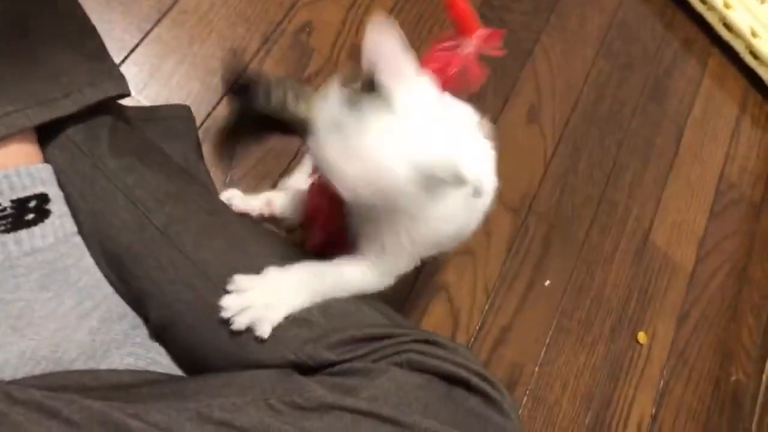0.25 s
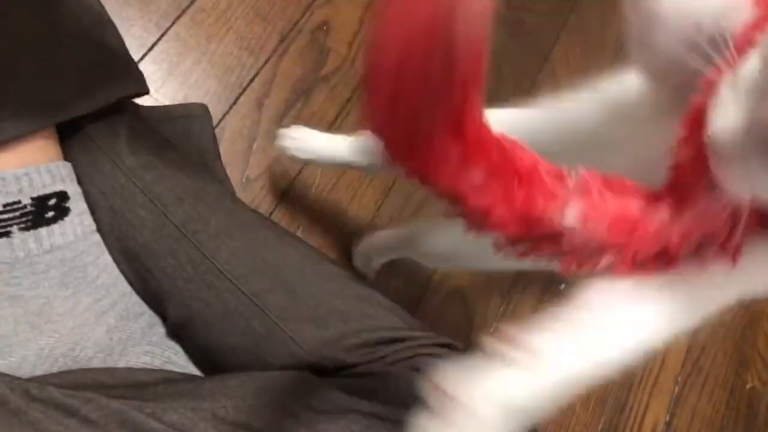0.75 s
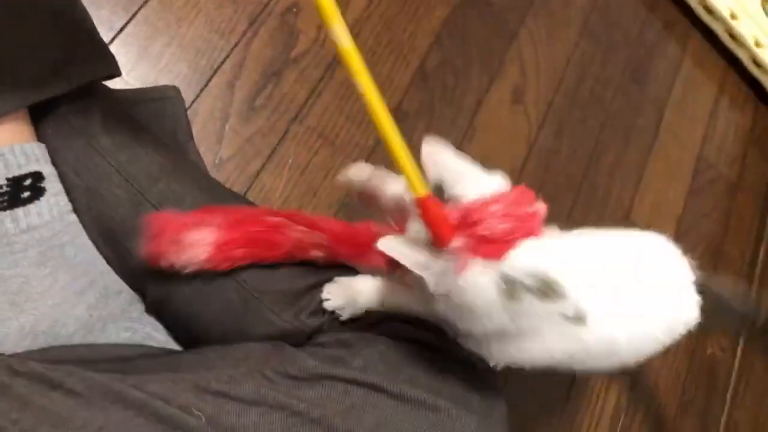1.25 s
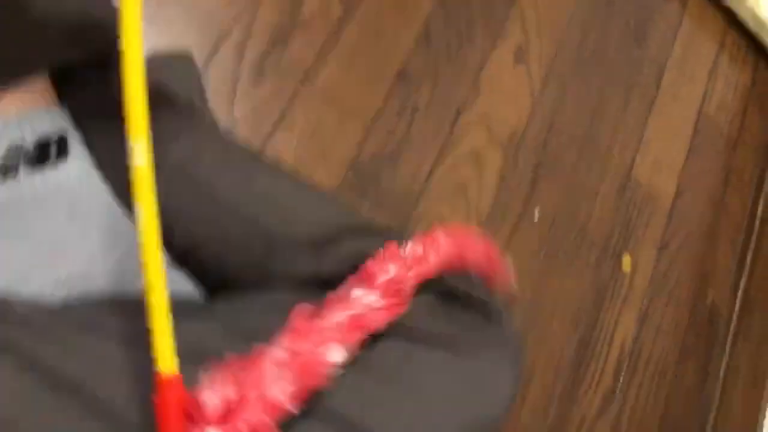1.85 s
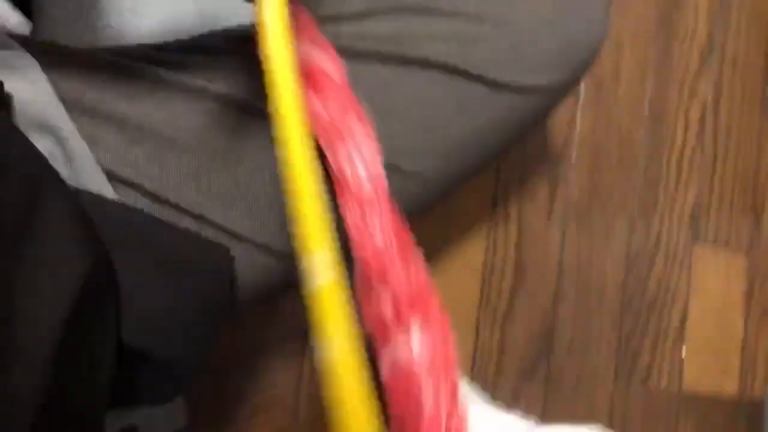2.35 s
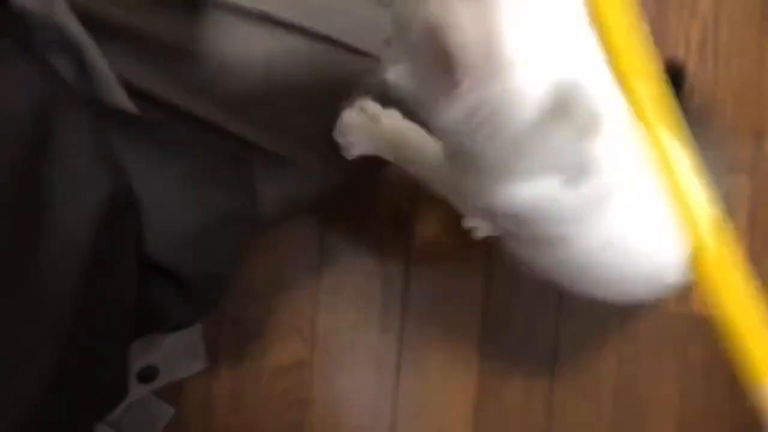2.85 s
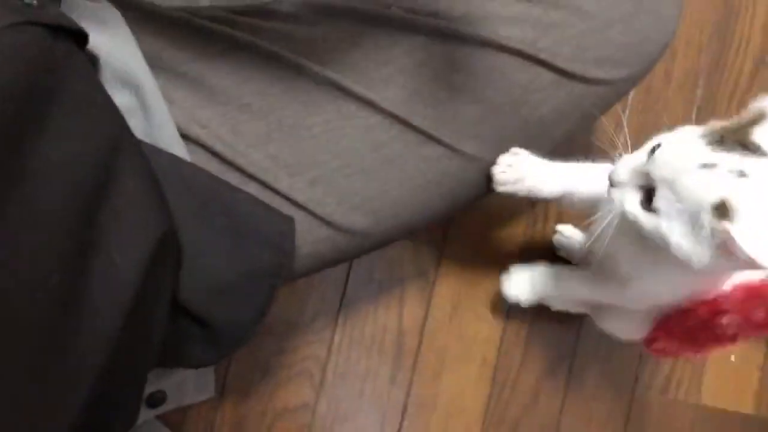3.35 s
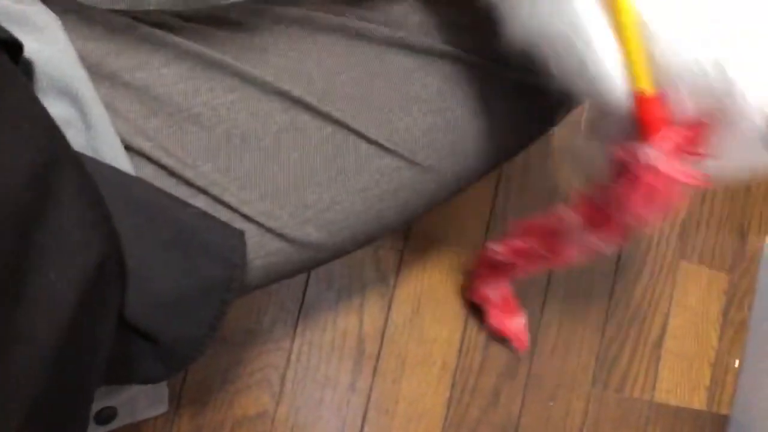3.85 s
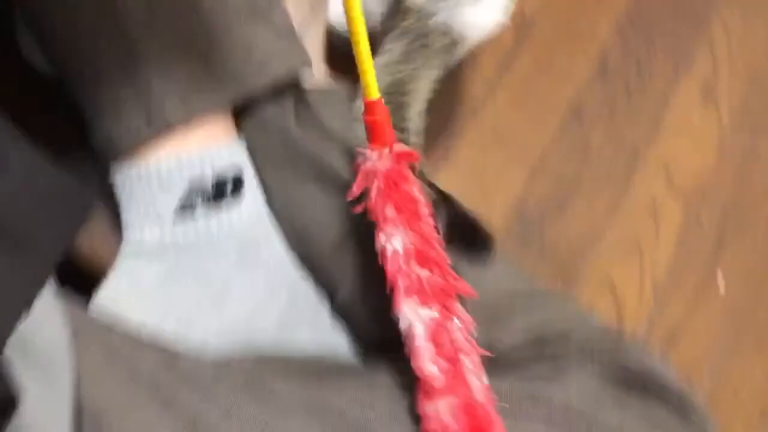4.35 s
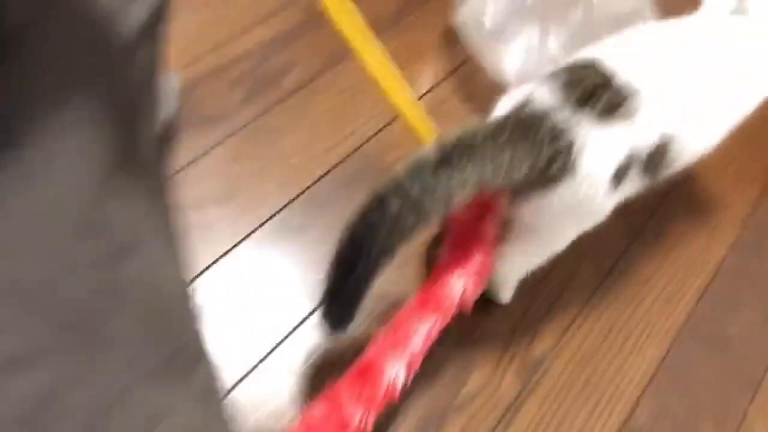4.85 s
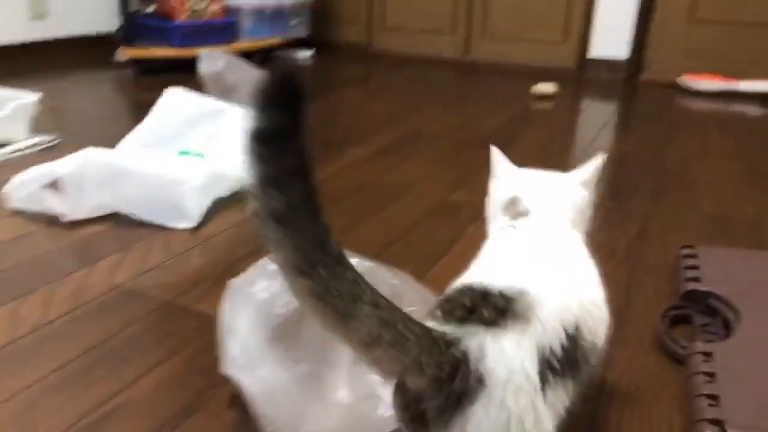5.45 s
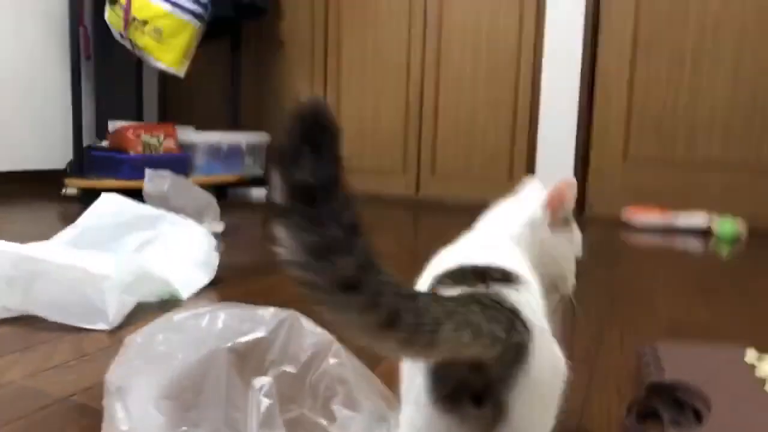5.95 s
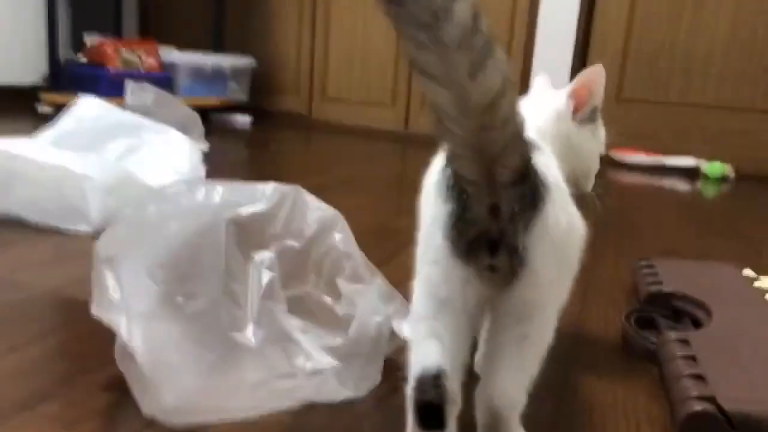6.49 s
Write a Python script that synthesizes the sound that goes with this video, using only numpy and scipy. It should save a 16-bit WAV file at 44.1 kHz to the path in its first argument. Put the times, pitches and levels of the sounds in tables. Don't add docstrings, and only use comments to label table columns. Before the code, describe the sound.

A kitten pounces with soft low thumps on wooden boards, brushing cloth and ticking its claws, before something hard bounces loudly at the end.

```python
import sys
import numpy as np
from scipy import signal
from scipy.fft import rfft, irfft
from scipy.io import wavfile
from scipy.ndimage import uniform_filter1d

SR = 44100
rng = np.random.default_rng(int(sys.argv[2]) if len(sys.argv) > 2 else 0)


def natural_amplitude(level_db):
    exponent = np.asarray(level_db, float) / 20
    return 10 ** exponent


def int16_out(signal):
    q = np.round(np.clip(np.atleast_2d(signal).T, -1, 1) * 32767)
    wavfile.write(sys.argv[1], SR, q.astype(np.int16))


N = 296352
SIZE = 2 ** 15
HZ = np.fft.rfftfreq(SIZE, 1 / SR)


def unit(x):
    return x / np.sqrt(np.mean(x ** 2) + 1e-20)


def along(points, hz):
    point_hz, values = np.transpose(points)
    return np.interp(np.log(hz + 1), np.log(point_hz + 1), values)


def peak(hz, width_hz):
    return 1j * HZ * width_hz / (hz * hz - HZ * HZ + 1j * HZ * width_hz + 1e-9)


def add(out, start_s, x):
    out[round(start_s * SR):][:len(x)] += x


def tail(onset_s):
    # (frequency [Hz], time to fall by 60 dB [s])
    ring_times = [(80, 0.3), (250, 0.34), (700, 0.32), (2000, 0.28), (6000, 0.21), (14000, 0.12)]
    hz, t, z = signal.stft(rng.standard_normal(SIZE * 3 // 4), SR, nperseg=512)
    decay = natural_amplitude(-60 * t / along(ring_times, hz)[:, None])
    x = signal.istft(z * decay, SR, nperseg=512)[1]
    x = x * (1 - np.exp(-np.arange(len(x)) / SR / onset_s))
    return rfft(x / np.linalg.norm(x), SIZE)


def noise(spectrum, patchy_db):
    z = signal.stft(rng.standard_normal(N + 512), nperseg=512)[2]
    patches = uniform_filter1d(rng.standard_normal(z.shape), size=5, axis=0)
    patches = uniform_filter1d(patches, size=8, axis=1)
    x = signal.istft(z * natural_amplitude(patchy_db * unit(patches)), nperseg=512)[1][:N]
    colour = natural_amplitude(along(spectrum, np.fft.rfftfreq(N, 1 / SR)))
    return unit(irfft(rfft(x) * colour, N))


def grains(depth_db, smooth):
    return natural_amplitude(depth_db * unit(uniform_filter1d(rng.standard_normal(N), size=smooth)))


def blows(table, sharp, slap_hz, onset_s, ring_db, spread_ms, order=2):
    # (frequency [Hz], width [Hz], level [dB])
    boards = [(90.5, 28, 2), (151.8, 21.4, -0.5), (259.3, 32.5, 2), (322.7, 29, 2), (409, 34, -1),
              (541, 38, -2), (734, 78, 2.5), (935, 87, 1), (1600, 560, -7), (2600, 980, 2)]
    out = np.zeros(N + SIZE)
    wood = sum((-1) ** k * natural_amplitude(db) * peak(hz, width) for k, (hz, width, db) in enumerate(boards))
    spread = np.exp(-4j * np.pi * spread_ms / 1000 * np.sqrt(200 * HZ))
    slap = peak(slap_hz, 0.61 * slap_hz) ** 2
    slap = slap / np.abs(irfft(slap)).max()
    for start, db, hz, slap_db in table:
        push = peak(hz, hz / sharp) ** order
        force = push / np.abs(irfft(push)).max() + natural_amplitude(slap_db) * slap
        ringing = 1 + natural_amplitude(ring_db) * wood * tail(onset_s)
        add(out, start - 0.001, natural_amplitude(db) * irfft(force * spread * ringing))
    return out[:N]


def landings():
    # (time [s], peak level [dB], push pitch [Hz], slap level [dB])
    pounces = [(1.0, -27, 213, -18), (1.003, -33, 445, -30), (1.012, -30.5, 262, -42),
               (1.064, -20.5, 201, -34), (1.129, -38.5, 160, -27), (1.746, -33.5, 163, -38),
               (1.769, -29, 127, -24), (1.792, -31, 145, -36), (1.793, -27, 350, -28),
               (1.796, -41, 780, -28), (1.81, -34.5, 340, -39), (1.922, -37, 480, -25),
               (1.921, -26.5, 190, -37), (1.949, -24.5, 161, -22), (2.015, -22.5, 143, -47),
               (2.027, -27, 143, -45), (2.084, -37.5, 154, -24), (2.932, -18.5, 179.6, -49),
               (2.936, -26.5, 350, -25), (2.958, -33, 91.5, -32), (4.159, -46.5, 400, -24),
               (4.186, -34, 328, -10), (4.217, -25, 259, -34), (4.24, -33.5, 194, -40),
               (4.235, -45, 88, -40), (4.343, -30.5, 293, -23), (4.36, -43.5, 87.5, -40),
               (4.357, -34, 320, -32), (4.41, -45, 195, -40), (4.43, -51, 91, -40), (4.493, -39, 334, -15)]
    return blows(pounces, sharp=1.29, slap_hz=1240, onset_s=0.00067, ring_db=0.5, spread_ms=5.62, order=3)


def bounces():
    # (time [s], peak level [dB], push pitch [Hz], slap level [dB])
    hits = [(6.328, -7, 400, -13.5), (6.335, -23.5, 107.5, -40), (6.339, -14.5, 275, -32),
            (6.336, -17, 204, -40), (6.363, -21, 260, -31), (6.435, -10.5, 575, -9.5),
            (6.44, -16.5, 319, -2.5), (6.51, -23.5, 486, 0), (6.52, -21, 258, -21),
            (6.532, -14.5, 352, -19), (6.533, -15.5, 1075, -9.5), (6.54, -14, 361, -44),
            (6.585, -33, 200, -32), (6.609, -42, 373, -22), (6.645, -41, 370, -20), (6.675, -40, 408, -21),
            (6.7, -43, 420, -24)]
    return blows(hits, sharp=1.66, slap_hz=1780, onset_s=0.0011, ring_db=-9, spread_ms=4.07)


def footsteps():
    # (time [s], peak level [dB], push pitch [Hz])
    paws = [(0.088, -54, 257), (0.238, -61, 91.5), (0.3, -66, 116), (0.808, -55, 191), (1.07, -38, 66.5),
            (1.224, -52, 248), (1.781, -44, 65.6), (1.93, -42, 66), (1.341, -72, 100.3),
            (1.538, -45.5, 209), (2.158, -46, 167), (2.224, -47.5, 107), (2.402, -47, 129),
            (2.779, -47.5, 133), (3.271, -58, 96), (3.818, -50.5, 143), (4.531, -44.5, 134),
            (4.746, -48.5, 187), (5.469, -49.5, 286), (5.59, -46.5, 394), (5.643, -43, 437),
            (5.659, -55, 102)]
    slap_db = -24
    steps = [(*row, slap_db) for row in paws]
    return blows(steps, sharp=1.63, slap_hz=1260, onset_s=0.0049, ring_db=-5, spread_ms=5.63)


def knocks():
    # (time [s], peak level [dB], push pitch [Hz])
    taps = [(0.999, -54, 1650), (1.058, -43.5, 1510), (1.059, -49, 1870), (1.063, -47.5, 624),
            (1.748, -53, 620), (1.794, -52, 1260), (1.922, -44, 593), (1.947, -44.5, 1570),
            (2.931, -40, 1600), (2.932, -60, 1830), (2.94, -40.5, 560), (6.331, -38.5, 2520),
            (6.331, -35.5, 845), (6.439, -45, 2800), (6.437, -36.5, 780), (6.535, -28, 1100),
            (6.61, -42.5, 388), (6.66, -46, 400), (6.69, -44, 433), (6.63, -49, 1100)]
    slap_db = -17.5
    taps = [(*row, slap_db) for row in taps]
    return blows(taps, sharp=3.34, slap_hz=3000, onset_s=0.0014, ring_db=7.0, spread_ms=2.965, order=3)


def ticks():
    # (time [s], peak level [dB], centre pitch [Hz], width [octaves])
    snaps = [(0.998, -53, 2600, 1.2), (1.62, -61, 2600, .7), (1.625, -48.5, 2600, 0.47),
             (1.634, -55, 1500, .6), (1.7894, -52.5, 3570, 1.6), (1.903, -53, 4900, 1.4),
             (2.7752, -32.5, 12400, 0.93), (2.921, -55, 4000, 1.1), (2.929, -49.5, 4400, 0.42),
             (3.1792, -55, 10100, 1.1), (3.3937, -56.5, 5840, 1.2), (3.4276, -59, 5870, 1.1),
             (3.671, -58, 11000, .5), (3.5443, -52, 7000, 2.5), (4.1888, -53, 5000, 3),
             (4.1914, -45.5, 5000, 2.3), (4.2115, -47, 5000, 3), (4.348, -36, 4470, .2),
             (4.348, -45, 6440, 0.18), (4.349, -47, 3530, 0.24), (4.366, -37.5, 4540, 0.72),
             (5.222, -51.5, 6020, 1.5), (5.592, -52.5, 2500, 1.1), (5.644, -55, 4200, 1.1),
             (6.328, -32.5, 3540, 1.5), (6.4337, -34, 3000, 0.63), (6.435, -39.5, 7860, 0.088),
             (6.5105, -40, 3170, 0.96), (6.5324, -34, 3050, 0.59)]
    cycles = 99
    out = np.zeros(N + SIZE)
    t = np.arange(SIZE) / SR
    for start, db, hz, octaves in snaps:
        fade = natural_amplitude(np.maximum(-60 * t * hz / cycles, -200))
        burst = rfft(rng.standard_normal(SIZE) * fade)
        burst = burst * peak(hz, hz * octaves) ** 2
        echoed = irfft(burst * (1 + natural_amplitude(-10.0) * tail(0.033)))
        add(out, start, natural_amplitude(db) * echoed / np.abs(irfft(burst)).max())
    return out[:N]


def strokes():
    # (time [s], level [dB], dull part over it [dB], time to fall by 60 dB [s])
    scuffs = [(0.086, -67.5, 4.5, 0.57), (0.236, -68.5, 6.5, 0.17), (0.997, -65, 17.5, 0.65),
              (1.06, -73, 19, 0.44), (1.612, -64.5, 12, 0.34), (1.79, -67.5, 10, 1), (1.915, -66.5, 9, 1),
              (2.774, -64.5, 4, 0.21), (2.926, -70, 25, 0.51), (3.05, -70, 3, 0.88),
              (4.183, -63.5, 10, 0.6), (4.343, -51, -0.5, 0.57), (4.855, -50, -10.5, 0.37),
              (4.871, -54, -7.5, 0.57), (5.22, -79, -3, 0.19), (5.59, -66, 16.5, 0.21),
              (6.325, -66, 27, 0.39), (6.433, -62, 29, 0.2), (6.509, -71, 31, 0.15), (6.533, -71, 29, 0.52)]
    # (start [s], end [s], level [dB], dull part over it [dB])
    rubs = [(0.3, 0.68, -77, 3.5), (1.456, 1.643, -73.5, 1), (1.612, 1.676, -62, 2), (1.704, 2.19, -73, 1),
            (1.866, 1.98, -66, -2), (2.2, 2.946, -73, 5), (3.36, 3.756, -69, -11), (3.798, 4.23, -73, 1),
            (4.16, 4.9, -71, 2), (4.942, 5.79, -67.5, 2.5), (5.735, 6.34, -72, -2.5),
            (6.547, 6.8, -76, 24.5)]
    attack_s, fade_s = 0.0021, 0.043
    t = np.arange(N) / SR
    power = np.zeros((2, N))
    for start, db, dull_db, t60 in scuffs:
        age = np.maximum(t - start, 0)
        shape = (1 - np.exp(-age / attack_s)) * natural_amplitude(-60 * age / t60)
        power += (natural_amplitude([[db], [db + dull_db]]) * shape) ** 2
    for start, end, db, dull_db in rubs:
        shape = (np.tanh((t - start) / fade_s) - np.tanh((t - end) / fade_s)) / 2
        power += (natural_amplitude([[db], [db + dull_db]]) * shape) ** 2
    return np.sqrt(power)


def brushing():
    # (frequency [Hz], level [dB])
    fur_colour = [(1180, 3), (2000, 2), (2640, 3), (4420, 0), (7680, -4), (8300, -3), (15700, -13)]
    # (frequency [Hz], level [dB])
    cloth_colour = [(300, 5.5), (700, -0.5), (1100, 0.5), (2000, -10.5), (3500, -19), (6000, -25)]
    bright, dull = strokes()
    flutter = grains(1.16, smooth=120)
    fur = unit(flutter * noise(fur_colour, patchy_db=2.5))
    cloth = unit(flutter * noise(cloth_colour, patchy_db=1.0))
    return bright * fur + dull * cloth


def whispers():
    # (start [s], end [s], level [dB])
    drags = [(2.77, 2.83, -70), (3.17, 3.22, -74), (3.383, 3.737, -73), (4.863, 4.92, -55.5),
             (4.93, 5.097, -70.5)]
    # (frequency [Hz], level [dB])
    feather_colour = [(2500, -13), (4000, -2), (5500, 5), (6500, -2), (7500, 0.5), (9500, -7.5),
                      (12500, -1), (15700, -16)]
    t = np.arange(N) / SR
    gain = np.zeros(N)
    for start, end, db in drags:
        gain += natural_amplitude(db) * (np.tanh((t - start) / 0.012) - np.tanh((t - end) / 0.037)) / 2
    return gain * unit(grains(4.3, smooth=200) * noise(feather_colour, patchy_db=2.5))


def hiss():
    # (frequency [Hz], level [dB])
    hiss_colour = [(15, -75), (35, -3), (91, 4), (123, -5), (300, -4), (1100, -15.5), (9000, -28.5),
                   (15800, -30)]
    return natural_amplitude(-64) * noise(hiss_colour, patchy_db=-0.3)


def scene():
    thuds = landings() + bounces() + footsteps() + knocks()
    rustle = brushing() + whispers()
    return (thuds + ticks() + rustle + hiss())[None]


def low_pass(x):
    return signal.sosfilt(signal.butter(12, 16040, fs=SR, output="sos"), x)


def record(dry):
    # (time [s], length [s])
    gap = (1.8, 0.0015)
    bass_cut = signal.butter(N=3, Wn=62, btype="high", fs=SR, output="sos")
    top_cut = signal.butter(N=6, Wn=15500, fs=SR, output="sos")
    mix = signal.sosfilt(top_cut, signal.sosfilt(bass_cut, dry))
    distance = np.abs(np.arange(N) / SR - gap[0])
    gate = np.clip(distance / gap[1] * 2 - 0.5, 0.05, 1)
    return low_pass(mix * gate)


dry = scene()
out = record(dry)
int16_out(out)
```